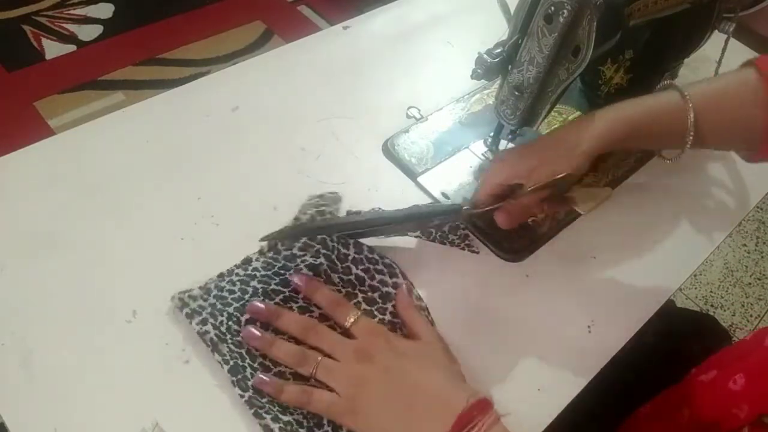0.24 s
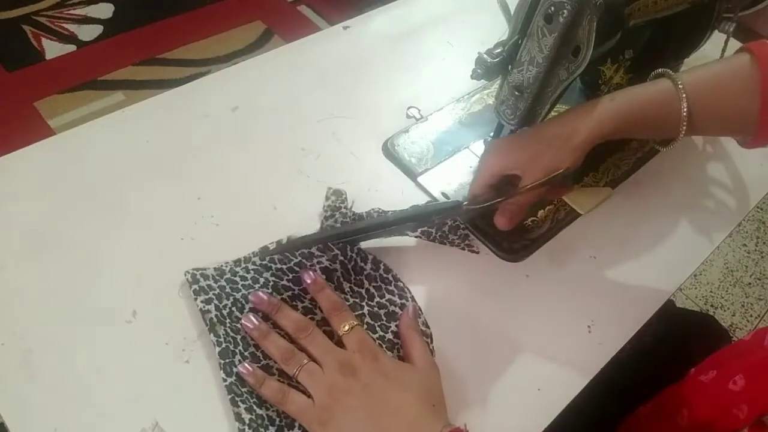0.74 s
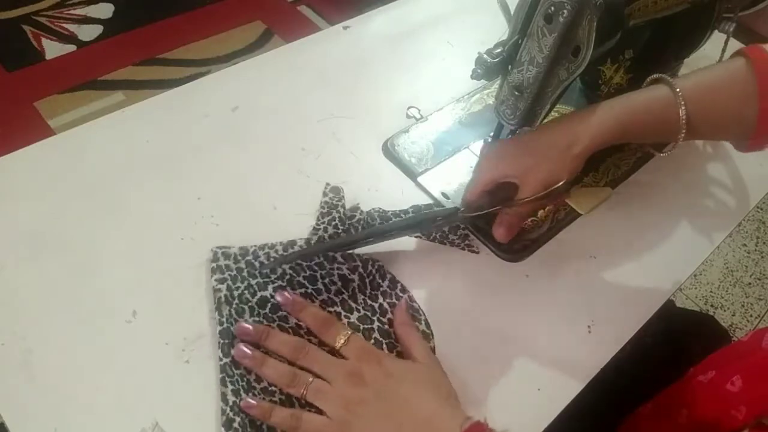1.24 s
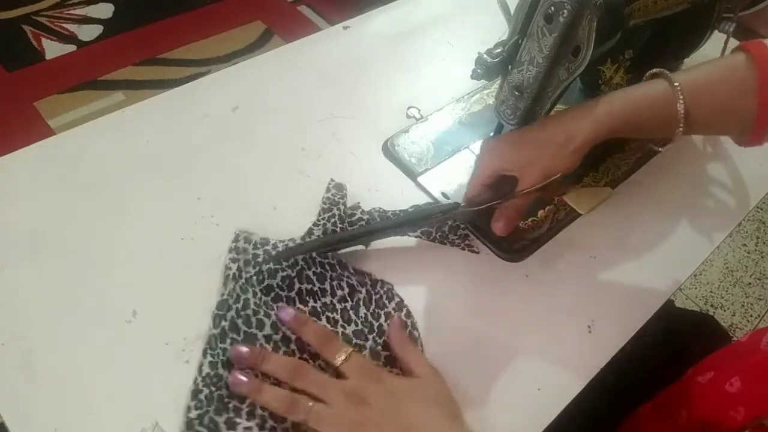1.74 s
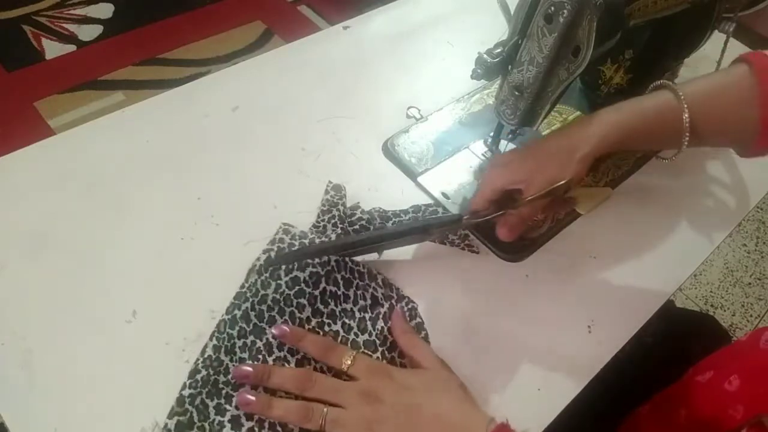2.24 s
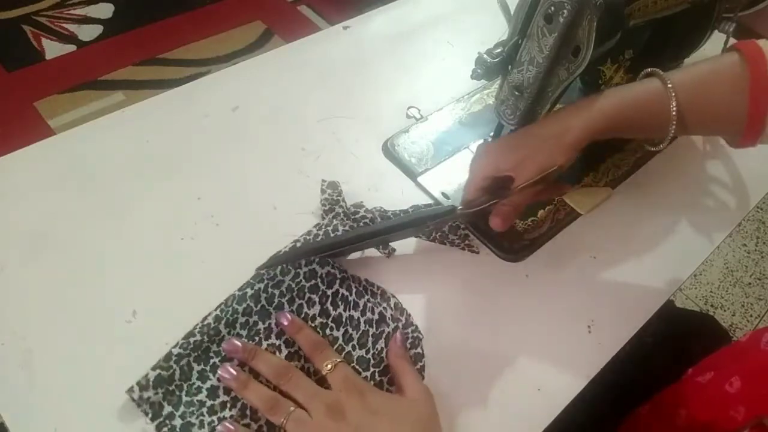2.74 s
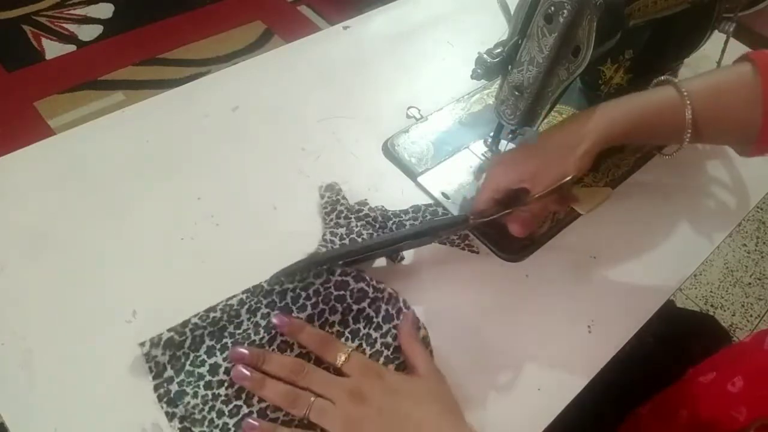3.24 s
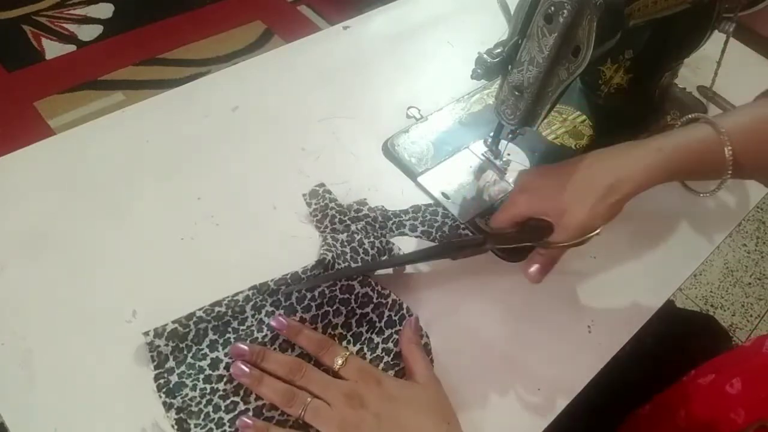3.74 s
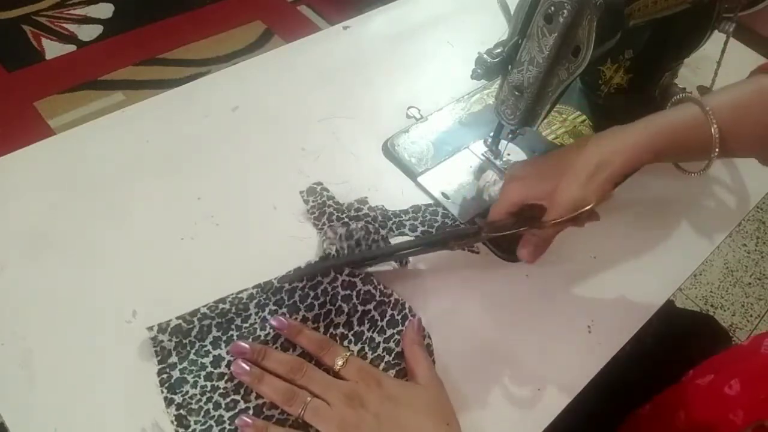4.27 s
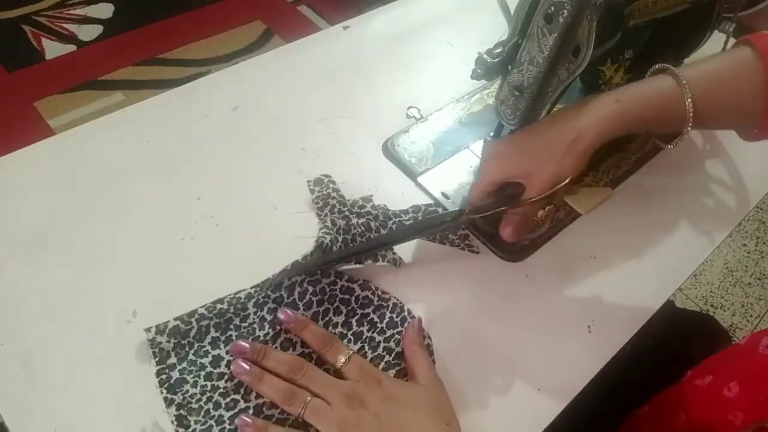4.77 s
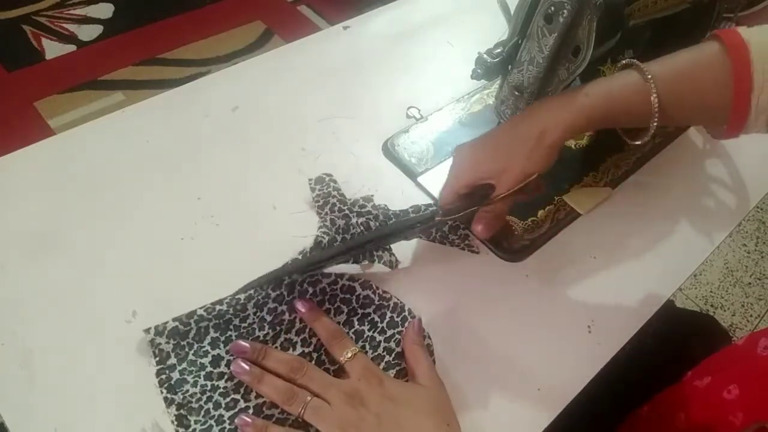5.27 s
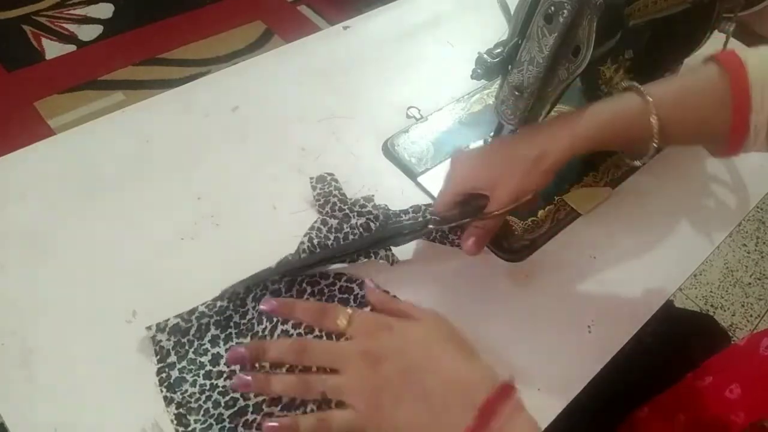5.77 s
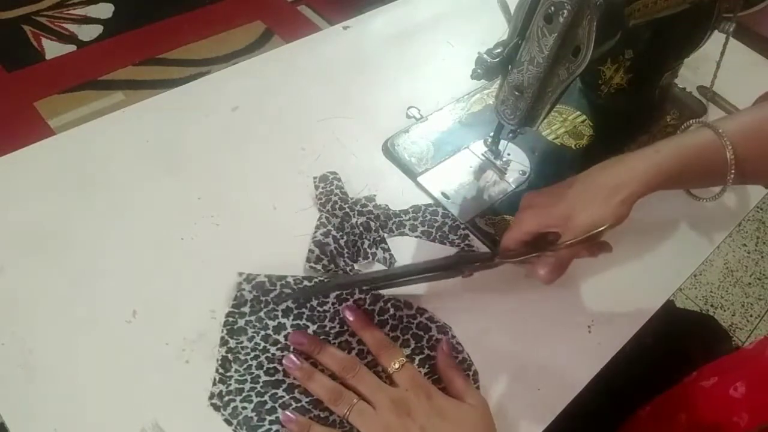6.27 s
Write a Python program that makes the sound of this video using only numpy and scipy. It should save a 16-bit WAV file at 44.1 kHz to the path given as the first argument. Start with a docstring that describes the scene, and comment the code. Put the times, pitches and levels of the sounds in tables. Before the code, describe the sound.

Large shears rasp and snip through doubled cloth on a wooden table, blades ticking open between cuts, with scrapes and knocks in a quiet room.

```python
"""Large shears snip through doubled cloth on a wooden table top, heard close from above in a quiet room.
Closing strokes rasp through the threads on a gliding steel ring; openings start with a tick of the blades.
The lower blade judders, scrapes and knocks on the board, ringing its modes; three hard drags cross it.
Gain strokes shape trains of noisy catches, which feed resonances at two ports; banded noise is the room."""
import sys
import numpy as np
from scipy import signal
from scipy.io import wavfile
from scipy.ndimage import uniform_filter1d

SR = 44100
rng = np.random.default_rng(int(sys.argv[2]) if len(sys.argv) > 2 else 0)


def int16_out(signal):
    """Quantize to a 16-bit WAV file."""
    q = np.round(np.clip(np.atleast_2d(signal).T, -1, 1) * 32767)
    wavfile.write(sys.argv[1], SR, q.astype(np.int16))


N = 287091
T = np.arange(N) / SR
MS = np.arange(0, N / SR + .002, .001)  # millisecond grid for gestures, in s
LEFT_LAG_SAMPLES = 7  # airborne sound reaches the left port late
SPOT_RATE_PER_S = 23  # pace at which the contact spot wanders


def undb(db):
    """dB to gain."""
    return 10 ** (np.asarray(db) / 20)


def level(x, db):
    """Scale to an rms level."""
    return x * undb(db) / np.sqrt(np.mean(x ** 2))


def band(x, hz, width_hz):
    """Two-pole resonance, gain 1 at the centre."""
    return signal.lfilter(*signal.iirpeak(min(hz, .45 * SR), hz / width_hz, SR), x)


def walk(rate):
    """Random levels held 1 / rate s and slewed twice; spread near 1."""
    hold = int(SR / rate)
    steps = np.repeat(rng.standard_normal(N // hold + 1), hold)
    slewed = uniform_filter1d(uniform_filter1d(steps, hold), hold)
    return 1.2 * slewed[:N]


def stroke(full_s, rise_s, hold_s, fall_s, db, sag_db_s=0):
    """Gain that climbs 25 dB per rise_s to full level, holds (sagging), then loses 25 dB per fall_s."""
    before = np.maximum(full_s - MS, 0) / max(rise_s, .002)
    after = np.maximum(MS - full_s - max(hold_s, 0), 0) / max(fall_s, .002)
    sag_db = sag_db_s * np.maximum(MS - full_s, 0)
    return undb(db - np.minimum(25 * (before + after) + sag_db, 150))


def play(strokes):
    """Sum of strokes, at every sample."""
    return np.interp(T, MS, sum(strokes))


def slips(rate, scatter_db, decay_s, steady, uneven=0.87):
    """Two unrelated noises under one train of catches: each starts at once, has its own size and dies away."""
    gap, size = rng.standard_normal((N // 100, 2)).T
    gap_samples = SR / rate * np.exp(uneven * gap - uneven ** 2 / 2)
    at = np.cumsum(gap_samples).astype(int)
    catches = np.zeros(N)
    catches[at[at < N]] = undb(scatter_db * size[at < N])
    train = signal.lfilter([1], [1, -np.exp(-1 / (decay_s * SR))], catches)
    return level((level(train, 0) + steady) * rng.standard_normal((2, N)), 0)


def rumble():
    """Slow coarse catches that feed the middle modes."""
    return slips(100, 2.8, 0.0038, 0.34)


def grit():
    """Quicker catches that feed the upper modes."""
    return slips(200, 2.36, 0.0044, 0.45)


def share(force, alike):
    """Two port forces that have the part 'alike' in common."""
    return np.array([force[0], alike * force[0] + np.sqrt(1 - alike ** 2) * force[1]])


def ring(force, modes, alike, lag_samples, spot_db, spot_rate=SPOT_RATE_PER_S):
    """Ring modes with a noise force, scaled for their summed power; the left port hears it late."""
    ports = share(force, alike)
    ports[0] = np.roll(ports[0], lag_samples)
    power = sum(undb(2 * db) * np.pi * width_hz / SR for _, width_hz, db, _ in modes)
    out = 0
    for k, (hz, width_hz, db, pan_db) in enumerate(modes):
        reach = undb(spot_db * walk(spot_rate))  # the contact moves, so every mode is fed now more, now less
        mode = band(reach * ports, hz, width_hz)
        mode = band(mode, hz, 3 * width_hz)  # darkens the skirts
        out = out + (-1) ** k * undb(db + np.array([[pan_db], [-pan_db]]) / 2) * mode
    return out / np.sqrt(power)


# spectrum of the quiet: f/Hz, relative density/dB
ROOM_SPECTRUM = [(25, -16.5), (123, -12.5), (300, -17), (394, -1), (560, -12), (734, -18), (887, -15),
                 (1190, -21.5), (1940, -26), (4250, -27.5), (5200, -36), (7710, -39), (14800, -31),
                 (16000, -39)]
ROOM_DB = -66


def room():
    """Quarter-octave bands of quiet air and microphone hiss; the bass is alike left and right and wavers more."""
    out = 0
    points_hz, points_db = np.transpose(ROOM_SPECTRUM)
    waver = walk(6.82)
    for hz in 28 * 2 ** np.arange(0, 9.2, 1 / 4):
        noise = rng.standard_normal((2, N))
        mid, side = band(band(noise, hz, hz / 4), hz, hz / 4)
        treble = np.clip(hz / 1200, .3, 1)
        db = np.interp(np.log(hz), np.log(points_hz), points_db)
        db = db + 4.3 * (1 - treble) * waver + 1.4 * walk(12.0)
        out = out + undb(db) * (mid + treble * side * np.array([[1], [-1]]))
    return level(out, ROOM_DB)


# hand and shears settle on the table, full 15 ms after t: t/s, drive level/dB
THUDS = [(1.075, -54), (1.397, -57), (2.353, -54), (5.112, -59), (5.914, -55)]
# heavy board mode: f/Hz, first-pass width/Hz, relative level/dB, left minus right/dB
THUD_MODE = (131, 81, 0, -.5)


def thuds(middle):
    """The weight on the board rumbles softly, swelling less than the scrape does, and thuds as it settles."""
    settle = play(stroke(s + 0.015, 0.034, 0.0036, 0.023, db) for s, db in THUDS)
    gain = undb(-49.0) * middle ** 0.35 + settle
    return ring(gain * rng.standard_normal((2, N)), [THUD_MODE], 0.89, 0, 3.4, 12)


# three hard drags, one table each: t/s, then drive level/dB of lowest, middle, upper and top modes
DRAGS = [
    [(1.046, -51, -77, -60, -82), (1.057, -40, -58, -54, -56), (1.078, -51.5, -54.5, -52, -55),
     (1.1, -36, -67, -68, -63), (1.109, -64, -65, -64, -63), (1.118, -32, -60, -61, -64),
     (1.127, -53, -65, -64.5, -68), (1.148, -40.5, -66, -76, -76), (1.162, -78, -61, -64, -82)],
    [(1.684, -52, -55, -69, -72), (1.702, -46, -69, -82, -87), (1.782, -42.5, -45, -59, -68.5),
     (1.91, -38.5, -47.5, -64, -71.5), (1.938, -49, -47, -65, -74), (1.968, -87, -55, -71, -78)],
    [(5.836, -66, -54, -70, -85), (5.854, -45.5, -40.5, -44.5, -63), (5.882, -35, -43.5, -46.5, -70),
     (5.934, -47, -39.5, -45.5, -55), (5.972, -41, -42, -37, -56.5), (6.0, -36, -39.5, -36, -53.5),
     (6.036, -32, -39, -36.5, -47.5), (6.056, -47, -45, -37, -53), (6.098, -43, -48, -47, -64),
     (6.13, -48, -60, -55, -71), (6.141, -74, -72, -66, -80)],
]


def drag(column, gains_db=(0, 0, 0)):
    """Gain of one group of modes through the hard drags; practically silent between them."""
    total = 0
    for rows, gain_db in zip(map(np.array, DRAGS), gains_db):
        t = np.r_[rows[0, 0] - .015, rows[:, 0], rows[-1, 0] + .02]
        db = np.r_[-95, rows[:, column], -95]
        total = total + undb(gain_db + np.interp(T, t, db, -150, -150))
    return total


# blade judder: full at t/s, hold/s, drive level/dB
JUDDER = [(0.036, 0.0031, -42.5), (0.087, 0.014, -45), (0.156, 0.0052, -43.5), (0.198, 0.011, -50.5),
          (0.227, 0.0018, -55), (0.252, 0.0033, -36), (0.282, 0.0046, -41.5), (0.428, 0.013, -46),
          (0.495, 0.038, -49.5), (0.61, 0.057, -49), (0.773, 0.014, -49.5), (0.797, 0.11, -39.5),
          (0.946, .01, -54), (1.244, 0.0011, -50.5), (1.32, 0.0042, -43.5), (1.337, 0.06, -37),
          (1.518, .005, -44), (1.545, 0.021, -38), (1.596, 0.03, -48), (1.991, 0.039, -49),
          (2.091, 0.0012, -46), (2.128, 0.021, -44.5), (2.3, 0.033, -49), (2.379, 0.013, -44.5),
          (2.416, 0.0045, -46.5), (2.546, 0.027, -47), (2.63, 0.0045, -45), (2.767, 0.0067, -42),
          (2.815, 0.0027, -37.5), (2.851, .008, -48.5), (2.893, .002, -54), (3.244, 0.015, -55),
          (3.768, 0.0076, -49), (3.81, 0.0046, -48), (4.341, 0.068, -37.5), (4.457, 0.0008, -48.5),
          (4.514, 0.04, -51), (4.57, .003, -51.5), (4.734, 0.046, -44), (4.847, 0.055, -46.5),
          (4.927, 0.032, -45.5), (4.993, 0.0032, -44), (5.093, 0.0029, -42.5), (5.139, 0.043, -38.5),
          (5.355, 0.033, -44.5), (5.419, 0.0035, -51), (5.583, 0.0079, -42.5), (6.23, 0.017, -45.5),
          (6.294, 0.023, -52.5), (6.455, 0.043, -36)]
# lowest board mode: f/Hz, first-pass width/Hz, relative level/dB, left minus right/dB
LOW_MODE = (379, 63.5, 0, -0.5)
JUDDER_RISE_S, JUDDER_FALL_S, JUDDER_SAG_DB_S = 0.014, 0.019, 62


def judder():
    """Stick and slip lock on to the board's lowest mode, with a pace that wanders around it."""
    gain = drag(column=1) + play(
        stroke(s, JUDDER_RISE_S, hold_s, JUDDER_FALL_S, db, JUDDER_SAG_DB_S) for s, hold_s, db in JUDDER)
    phase = 2 * np.pi * np.cumsum(LOW_MODE[0] * (1 + 0.04716 * walk(35))) / SR
    force = gain * (undb(-20.5) * np.sin(phase) + undb(-3.5) * slips(90, 5.3, 0.032, 0.44))
    stiff = signal.butter(2, 290, "high", fs=SR, output="sos")  # below this mode the board hardly radiates
    return signal.sosfilt(stiff, ring(force, [LOW_MODE], 0.96, 0, 0.95, 45))


# blade and cloth slide on the board: full at t/s, hold/s, middle modes' drive level/dB,
# upper modes above them/dB, edge mode above the upper/dB
SLIDES = [(0.164, 0.11, -61.5, 0, -3.5), (0.583, 0.046, -66, 6, 1), (1.532, 0.041, -57, 2.5, -1.5),
          (2.064, 0.11, -61, 3, -11), (2.551, 0.038, -63, 9.5, -1), (2.872, 0.079, -69, -33, 0),
          (3.086, 0.01, -58, -15, -5), (3.236, 0.022, -62, 2, -7.5), (3.576, 0.0077, -72, 10, -1),
          (3.75, 0.06, -63, 2.5, 3.5), (3.97, .001, -61, -18, -2), (4.038, 0.0049, -57.5, -14, -3),
          (4.534, 0.029, -59, -1, 2), (4.92, 0.052, -60, -2.5, 1), (5.351, 0.028, -58.5, -8.5, 13.5),
          (6.197, 0.074, -58.5, 0, -11), (6.325, 0.02, -63, 1, -14)]
SLIDE_RISE_S, SLIDE_FALL_S = 0.035, 0.064
BITE_RISE_S, BITE_HOLD_S, BITE_FALL_S = 0.0047, 0.0097, 0.1
JOLT_RISE_S, JOLT_FALL_S = 0.0069, 0.073
BEFORE_BITE_DB = -1.5  # the board scrapes softly, then the bite comes at once
SOFT_CONTACT_DB = -5  # slides wake the bright modes less


def scrapes():
    """Gains of the middle, upper, bright and edge modes: bites, jolts and slides each have one shape."""
    hard = []
    for start, bite, _, _, _, middle_db, upper_db, edge_db, _ in SNIPS:
        hard.append((bite, BITE_RISE_S, BITE_HOLD_S, BITE_FALL_S, middle_db, upper_db, edge_db))
        hard.append((bite, bite - start, 0, BITE_RISE_S, middle_db + BEFORE_BITE_DB, upper_db, edge_db))
    hard += [(s, JOLT_RISE_S, 0, JOLT_FALL_S, *dbs) for s, _, *dbs, _ in TICKS]
    soft = [(s, SLIDE_RISE_S, hold_s, SLIDE_FALL_S, *dbs) for s, hold_s, *dbs in SLIDES]
    middle = play(stroke(*row[:5]) for row in hard + soft)
    upper_hard = play(stroke(*row[:4], row[4] + row[5]) for row in hard)
    upper_soft = play(stroke(*row[:4], row[4] + row[5]) for row in soft)
    edge = play(stroke(*row[:4], sum(row[4:])) for row in hard + soft)
    return middle, upper_hard + upper_soft, upper_hard + undb(SOFT_CONTACT_DB) * upper_soft, edge


SNICK_FALL_S = 0.0079
TICK_SNICK_DB, BITE_SNICK_DB = -12, -12  # relative to the upper modes


def snicks():
    """Short gain bursts: the first touch of each tick and the crunch as the blades bite."""
    touch = play(stroke(s, 0.0011, 0.00041, SNICK_FALL_S, middle_db + upper_db + TICK_SNICK_DB)
                 for s, _, middle_db, upper_db, *_ in TICKS)
    crunch = play(stroke(bite, 0.0017, 0.001, SNICK_FALL_S, middle_db + upper_db + BITE_SNICK_DB)
                  for _, bite, _, _, _, middle_db, upper_db, *_ in SNIPS)
    return touch + crunch


# dull knocks of the blade on the board: t/s, middle modes' drive level/dB
KNOCKS = [(1.839, -50), (1.899, -55), (4.302, -49), (6.034, -42), (6.233, -49.5), (6.444, -40)]


def knocks():
    """Short gain bursts as the blade knocks on the board."""
    return play(stroke(s, 0.0018, 0.00095, 0.0072, db) for s, db in KNOCKS)


# each drag: last middle mode above the others/dB, edge mode above the upper/dB,
# creak and highest modes above the top/dB, both before their own gains
DRAG_COLOUR = [(14, 6.5, -5), (-6, -16, -1), (2, -10.5, 0)]
# board modes: f/Hz, first-pass width/Hz, relative level/dB, left minus right/dB
MIDDLE_MODES = [(503, 130, -6, 2), (633, 25, -0.5, 0.5), (711, 68, 5.5, 1), (917.3, 52, 0, 1.5)]
EDGE_MODE = (1345, 91, 0, 1.5)
CREAK_MODE = (1569, 50, 0, -1.5)
UPPER_MODES = [(1039, 57, -4.5, 1.1), (1186, 66, 6, 1.9)]
BRIGHT_MODES = [(1752, 133, -1.5, 0.8), (1952, 49, -7, 2)]
TOP_MODES = [(2310, 350, 8.7, 0.14), (2930, 156, 6.4, 0.08), (3410, 440, 4.7, 0.53)]
HIGHEST_MODES = [(4150, 120, 2, 0.46), (5400, 1300, -1, 0.21)]
BRIGHT_DB, DRAG_BRIGHT_DB = -7.5, -2  # relative to the upper modes; in a drag, to its top modes


def board():
    """Judder, scrapes, drags, knocks and thuds shake the table top; each mode group is fed from its own spot."""
    middle, upper, bright, edge = scrapes()
    snick, knock = snicks(), knocks()
    lift_db, edge_db, hard_db = np.transpose(DRAG_COLOUR)
    hard = drag(column=4, gains_db=hard_db)
    middle = middle + knock
    thud = thuds(middle)
    lifted = middle + drag(column=2, gains_db=lift_db)
    middle = middle + drag(column=2)
    edge = edge + drag(column=3, gains_db=edge_db)
    creak = undb(-23.0) * edge + undb(5.5) * hard
    upper = upper + undb(-4.0) * knock + snick + drag(column=3)
    top = undb(-13.0) * bright + undb(-27.0) * snick + drag(column=4)
    bright = undb(BRIGHT_DB) * (bright + snick) + undb(DRAG_BRIGHT_DB) * drag(column=4)
    # the harder a drag, the more it reaches the highest modes
    highest = undb(-8.5) * top + undb(33.5) * hard ** 1.73

    lag = LEFT_LAG_SAMPLES
    out = judder() + thud
    out += ring(middle * rumble(), MIDDLE_MODES[:-1], 0.57, lag - 2, 1.36)
    out += ring(undb(-6.5) * lifted * rumble(), MIDDLE_MODES[-1:], 0.53, lag - 2, 2.3)
    out += ring(edge * grit(), [EDGE_MODE], 0.63, lag, 2.2)
    out += ring(creak * grit(), [CREAK_MODE], 0.63, lag, 2.9)
    out += ring(upper * grit(), UPPER_MODES, 0.66, lag, 3.0)
    out += ring(bright * grit(), BRIGHT_MODES, 0.51, lag, 1.8)
    out += ring(top * slips(250, 0.59, 0.011, 0.37), TOP_MODES, 0.44, lag, 4.5)
    out += ring(highest * slips(400, 1.3, 0.0039, 0.73), HIGHEST_MODES, 0.26, lag, 6.2)
    return out


CLOSING_HZ, OPENING_HZ = 5990, 5894  # pitch at the bite and at the tick
CLOSING_CLIMB_HZ, CLOSED_SAG_HZ, OPENING_CLIMB_HZ = 220.4, 51.7, 125.5
RING_WIDTH_HZ, RING_PAN_DB, RING_ALIKE = 183, 2.5, 0.38


def gliding_ring(force):
    """One steel resonance whose pitch follows the blades' crossing: up as they close, up after each tick."""
    points = []
    for start, bite, *_ in SNIPS:
        points += [(start, CLOSING_HZ - CLOSING_CLIMB_HZ), (bite, CLOSING_HZ)]
        points.append((bite + 0.031, CLOSING_HZ - CLOSED_SAG_HZ))
    for s, *_ in TICKS:
        points += [(s, OPENING_HZ), (s + 0.0315, OPENING_HZ + OPENING_CLIMB_HZ)]
    hz = np.interp(T, *np.transpose(sorted(points))) + 95.0 * walk(60)
    carrier = np.exp(2j * np.pi * np.cumsum(hz) / SR)
    # low-passed complex noise on a gliding carrier is a gliding resonance
    lowpass = signal.butter(2, RING_WIDTH_HZ / 2, fs=SR, output="sos")
    slow = signal.sosfilt(lowpass, share(force, RING_ALIKE))
    carriers = np.array([np.roll(carrier, LEFT_LAG_SAMPLES), carrier])
    pan = undb(np.array([[RING_PAN_DB], [-RING_PAN_DB]]) / 2)
    return np.real(slow * carriers) * np.sqrt(2 * SR / RING_WIDTH_HZ) * pan


# closing strokes: start t/s, bite t/s, end t/s, ring drive level/dB, thread hiss above the ring/dB,
# middle modes' drive level/dB, upper modes above them/dB, edge mode above the upper/dB,
# side rings above the ring/dB (ring and side drives before their own gains)
SNIPS = [(0.028, 0.057, 0.13, -61, -13.5, -52.5, -11.5, -10, 1),
         (0.387, 0.419, 0.49, -56.5, 4.5, -42.5, -2.5, -8, 3.5),
         (0.762, 0.806, 0.88, -54, -1, -41.5, -4.5, -23, -5),
         (1.262, 1.339, 1.414, -55.5, -1, -43.5, -4, -12, -3),
         (1.679, 1.733, 1.85, -58, 0, -51, -2, -15, -4), (1.984, 2.01, 2.08, -58, -16, -52, -11, -9, -4),
         (2.288, 2.345, 2.43, -53.5, -3, -44, -5, -23, -7),
         (2.738, 2.813, 2.88, -56.5, 0.5, -47.5, -4.5, -6, -2.5),
         (4.298, 4.346, 4.42, -53.5, -1, -40.5, -6, -10, -6),
         (4.707, 4.741, 4.8, -51.5, -5, -44.5, 2, -6.5, -6),
         (5.084, 5.148, 5.225, -58, -0.5, -47, -5, -1, -3),
         (5.546, 5.571, 5.63, -48, -5, -50, -5.5, -2, -5),
         (6.354, 6.407, 6.6, -63.5, -4.5, -59.5, 0.5, -1, 0), (6.441, 6.467, 7.4, -52, 0, -39, -6, -6, -3)]
# blades tick as they part and jolt the board: t/s, ring drive level/dB, middle modes' drive level/dB,
# upper modes above them/dB, edge mode above the upper/dB, side rings above the ring/dB (as for SNIPS)
TICKS = [(0.531, -46.5, -54, 7, -15, 5), (0.9586, -46, -54, 8, -8.5, -5.5), (1.258, -68.5, -66, -6, -3, 6),
         (1.4505, -46.5, -51.5, 4.5, -4, 1.5), (2.478, -47.5, -45.5, 0.5, -6, 0),
         (3.1115, -53.5, -49.5, -9, -19, -2), (4.119, -47, -41, -14, -5.5, -1.5),
         (4.4713, -42.5, -46, 3.5, -4.5, -3), (4.857, -38, -47.5, 5, 3, -7),
         (5.289, -45.5, -49, 4.5, -5, 1), (5.519, -56.5, -52.5, -12, -4, 0), (5.851, -60, -50, -11, -5, -3),
         (6.006, -52, -47, 9, -2, 13)]
# side rings, thread hiss: f/Hz, first-pass width/Hz, relative level/dB, left minus right/dB
SIDE_RING_MODES = [(5010, 200, -3.5, 1), (5570, 400, 5.5, 0), (6780, 370, -5, 7)]
HISS_MODES = [(8510, 1450, -6, 1.6), (10720, 1400, -0.5, 2), (14000, 810, 3, 2.4), (15400, 460, 1, 2.4)]
STEEL_RISE_S, STEEL_FALL_S, STEEL_SAG_DB_S = 0.028, 0.03, 26
HISS_FALL_S, HISS_SAG_DB_S = 0.02, 121
TICK_RISE_S, TICK_FALL_S, TICK_HISS_DB = 0.0083, 0.049, -15.5


def blades():
    """Edge on edge: a gliding steel ring with side rings and a crackling hiss of parting threads."""
    steel, hiss = [], []
    for start, bite, end, db, hiss_db, *_ in SNIPS:
        hold_s = end - start - STEEL_RISE_S - STEEL_FALL_S
        steel.append(stroke(start + STEEL_RISE_S, STEEL_RISE_S, hold_s, STEEL_FALL_S, db, STEEL_SAG_DB_S))
        # the threads give way inside the stroke, so the hiss shares its start and end
        hold_s = end - bite - HISS_FALL_S
        hiss.append(stroke(bite, bite - start, hold_s, HISS_FALL_S, db + hiss_db, HISS_SAG_DB_S))
    for s, db, *_ in TICKS:
        steel.append(stroke(s, TICK_RISE_S, 0.0027, TICK_FALL_S, db))
        hiss.append(stroke(s, 0.97 * TICK_RISE_S, 0.0027, 1.3 * TICK_FALL_S, db + TICK_HISS_DB))
    sides = play(gain * undb(row[-1]) for gain, row in zip(steel, SNIPS + TICKS))
    chatter = slips(130, 2.2, 0.0056, 0.099, 0.32)
    fine_chatter = slips(220, 7.2, 0.0019, 0.2)
    threads = play(hiss) * slips(500, 3.8, 0.0014, 0.5, 0.6)
    main = undb(-4.0) * gliding_ring(play(steel) * (chatter + 1j * fine_chatter))
    side = ring(undb(-6.0) * sides * chatter, SIDE_RING_MODES, 0.17, LEFT_LAG_SAMPLES, 3.7, 40)
    return main + side + ring(threads, HISS_MODES, 0.22, LEFT_LAG_SAMPLES, 4.35, 90)


def scene():
    """Board and blades over the room's quiet."""
    return room() + board() + blades()


TOP_HZ = 15850


def record(dry):
    """A steep low-pass cuts the top."""
    return signal.sosfilt(signal.ellip(14, .2, 90, TOP_HZ, fs=SR, output="sos"), dry)


dry = scene()
out = record(dry)
int16_out(out)
```